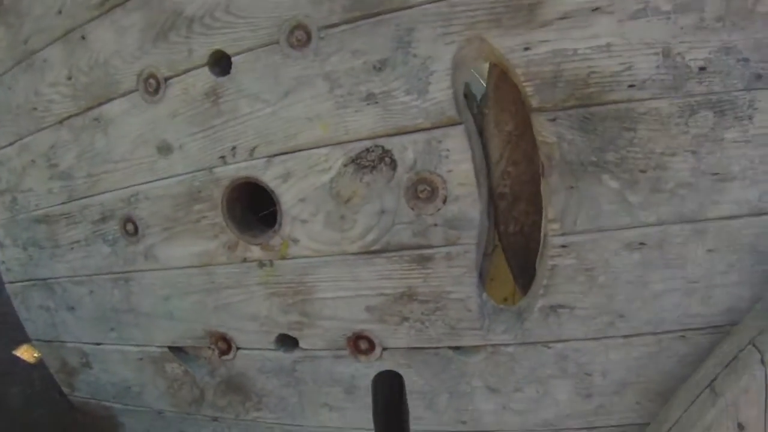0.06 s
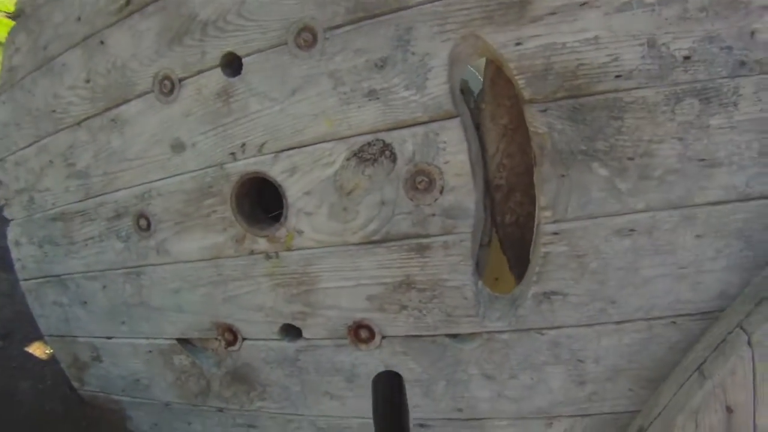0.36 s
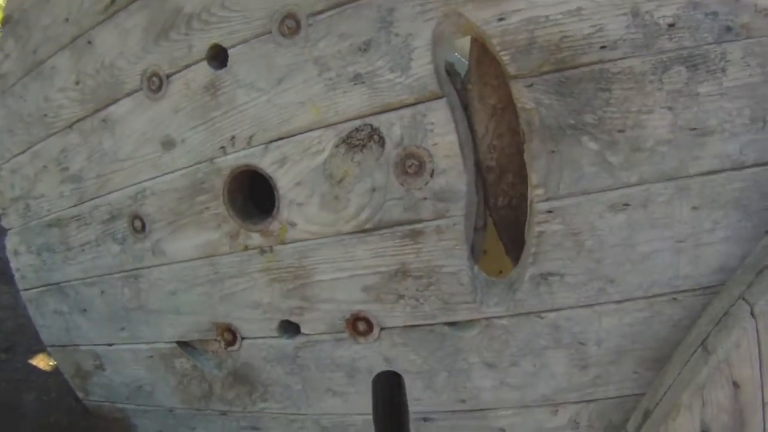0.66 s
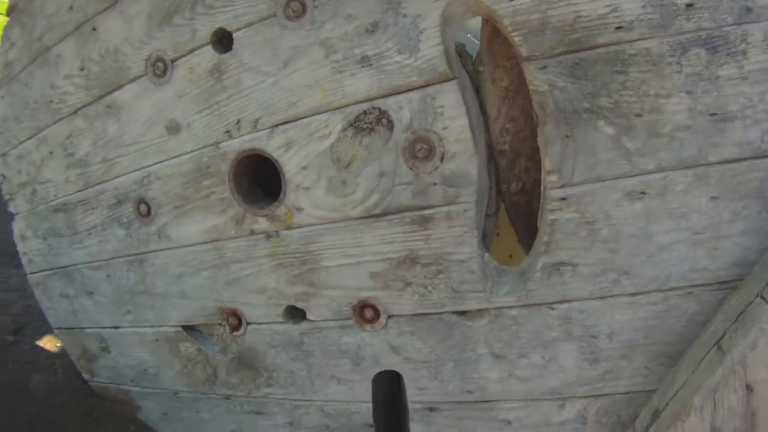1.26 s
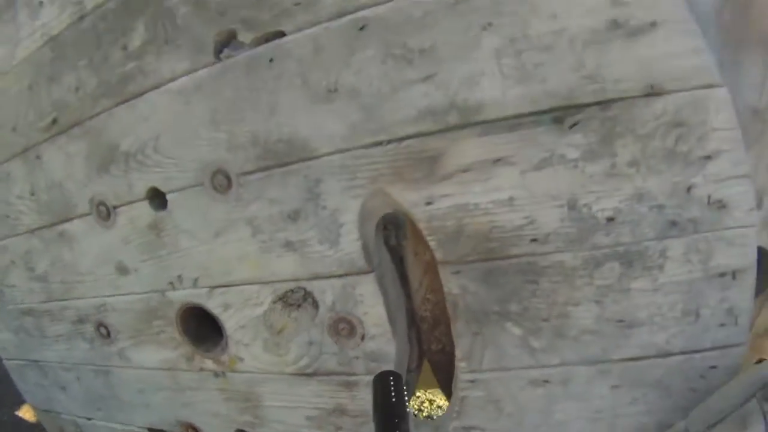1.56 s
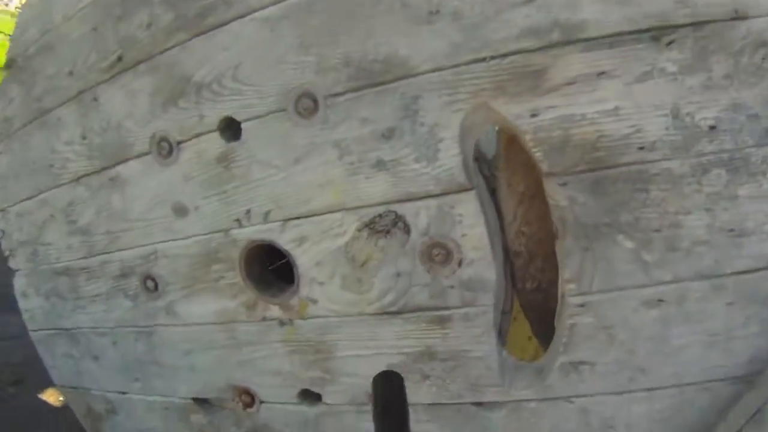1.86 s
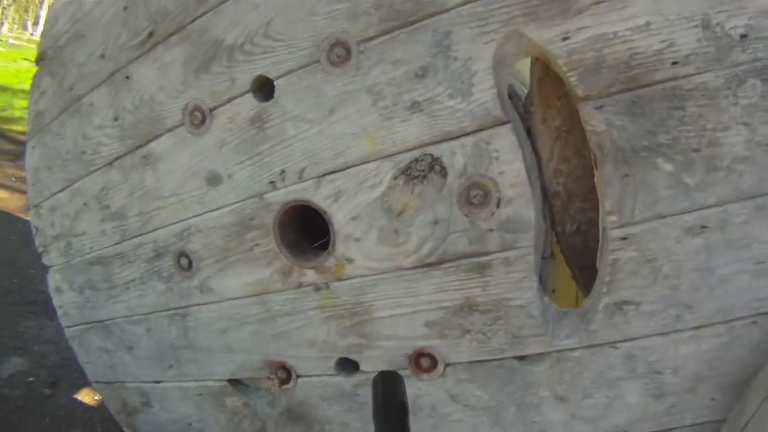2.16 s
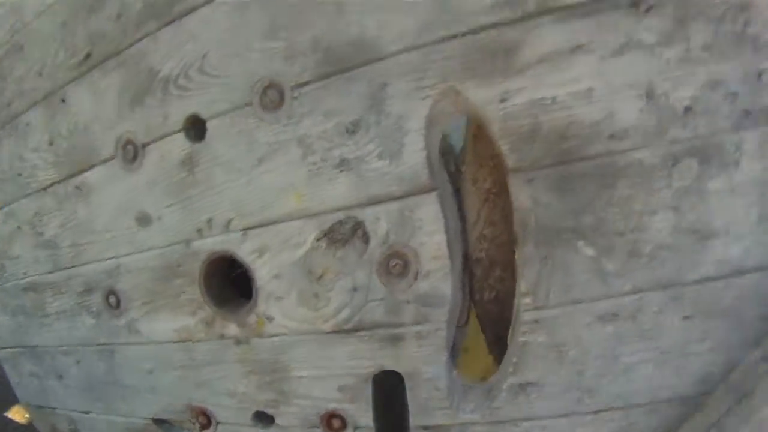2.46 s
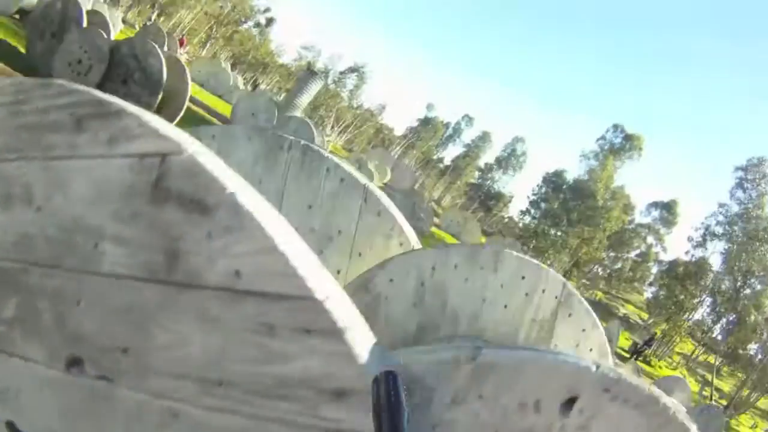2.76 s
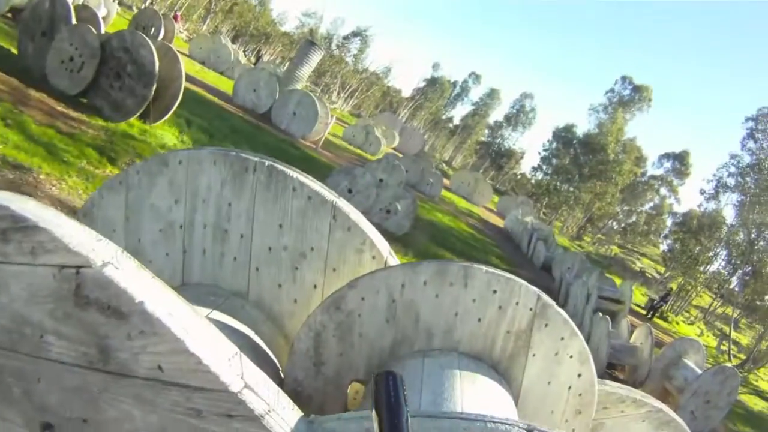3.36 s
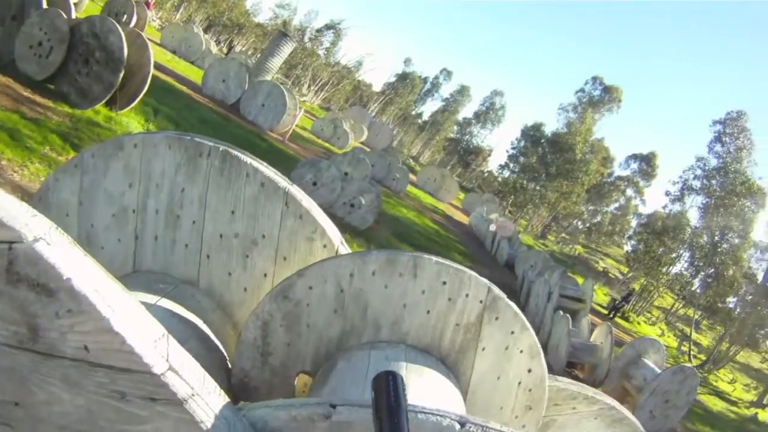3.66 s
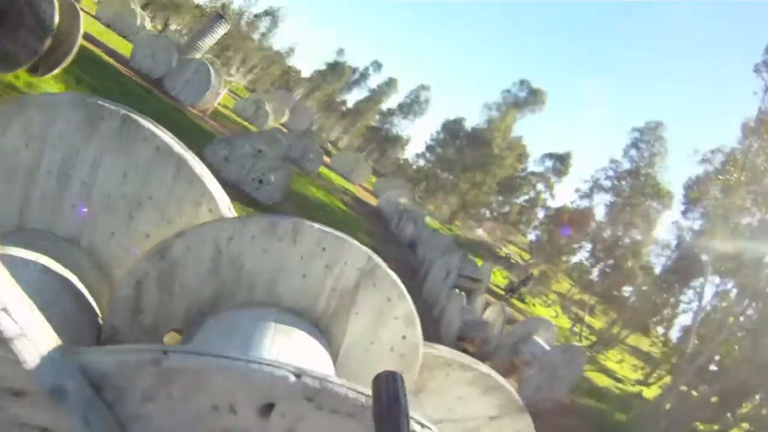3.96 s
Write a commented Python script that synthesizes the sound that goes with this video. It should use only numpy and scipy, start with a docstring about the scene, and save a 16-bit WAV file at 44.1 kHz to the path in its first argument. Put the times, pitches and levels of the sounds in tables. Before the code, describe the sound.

A paintball hopper rattles lightly up close at the start, with low handling rumble. Distant paint hits crack around 0.5 and 1.1 seconds, echoing over an open field. The hopper churns and knocks loudly from 1.4 to 2.3 seconds, with soft thumps, and again from 2.8. Three quick, hollow marker shots pop between 3.2 and 3.4 seconds. The rattle then eases, and a faint tone rings from 3.6.

```python
"""A paintball hopper churns and knocks in bursts, heard close up by one microphone in a plastic camera case.
The case rides on the player's gear behind a wooden cable spool: the balls ring it, movement thumps it.
Late on, the marker fires three shots at close range, each followed by its bolt.
Further off, other players' paint cracks on the spools and echoes over the open field.
A faint tone rings at the end."""
import sys
import numpy as np
from scipy import signal
from scipy.fft import rfft, irfft, next_fast_len
from scipy.io import wavfile
from scipy.ndimage import uniform_filter1d, minimum_filter1d, map_coordinates

SR = 44100
rng = np.random.default_rng(int(sys.argv[2]) if len(sys.argv) > 2 else 0)


def unload_audio(sound):
    """Save the sound as a 16-bit wav file, at the path given as the first command line argument."""
    columns = np.transpose(np.atleast_2d(sound))
    # keep every value between -1 and 1, then stretch to whole-number steps
    steps = np.round(np.clip(columns, -1, 1) * 32767)
    wavfile.write(sys.argv[1], SR, steps.astype(np.int16))


N = 176400

# hush of the open field: f/Hz, level/dB
HUSH_SPECTRUM = [(20, -2.5), (80, -4.5), (180, -28), (260, -31.5), (400, -30.5), (800, -32.5), (1100, -34),
                 (2300, -33.5), (4000, -37.5), (6000, -43)]
# handling rumble on the case: t/s, level/dB
RUMBLE_LEVELS = [(0.0, -33.5), (0.34, -25), (0.63, -58.5), (0.69, -35.5), (1.04, -63.5), (1.06, -51.5),
                 (1.25, -63), (1.51, -23), (1.56, -50), (1.6, -32), (1.67, -17.5), (1.73, -37),
                 (1.79, -26.5), (1.96, -32.5), (2.13, -23), (2.17, -52), (2.23, -34), (2.42, -45.5),
                 (2.54, -24), (2.6, -43.5), (2.79, -46), (2.87, -20), (3.29, -30), (3.34, -38), (3.4, -36),
                 (3.46, -39), (3.62, -30), (3.65, -36), (3.74, -23.5), (3.77, -42.5), (3.85, -23),
                 (3.89, -54), (4.0, -27.5)]
# colour of that rumble: f/Hz, level/dB
RUMBLE_SPECTRUM = [(25, -23), (58, -9.5), (90, 0.5), (130, -7.5), (190, -25), (240, -13), (400, -33),
                   (1500, -64.5)]
# slow sway of the camera: t/s, level/dB
SWAY_LEVELS = [(0.0, -56), (0.13, -27.5), (0.21, -44), (1.18, -51.5), (1.7, -32.5), (1.97, -44),
               (2.02, -38), (2.47, -57), (2.52, -32.5), (2.82, -31), (2.88, -19.5), (2.94, -38),
               (3.26, -35), (4.0, -45)]
# colour of that sway: f/Hz, level/dB
SWAY_SPECTRUM = [(12, -15), (26, -21.5), (37, 4), (55, -15.5), (90, -26.5), (400, -76.5)]
# soft bumps on the case: t/s, peak/dB, f/Hz, rise/s
CASE_BUMPS = [(1.487, -19.5, 81.6, 0.009), (1.667, -11.5, 112.6, 0.0052), (2.527, -14.5, 78.3, 0.011),
              (2.864, -13.5, 37.3, 0.0076), (3.001, -16.5, 108, 0.011), (3.809, -23, 83, 0.015),
              (3.84, -27, 87.3, 0.0095)]
# paint bursting on nearby spools: t/s, relative level/dB, echo offset/dB
PAINT_CRACKS = [(0.422, -32.5, -35), (0.435, -27.5, -9.5), (0.446, -31.5, -27), (0.457, -34.5, -11),
                (0.496, -38.5, -17), (0.5715, -30, -21), (1.064, -21, -1.5), (1.381, -36, -41),
                (1.583, -37.5, -27), (3.928, -41.5, -0.5)]
# resonances in airborne sound at the microphone: f/Hz, width/Hz, level/dB
AIR_PEAKS = [(1085, 120, -7.5), (1476, 120, -4.5), (2250, 480, -0.5), (2720, 450, -7), (3780, 220, -1.5),
             (5140, 600, -20.5)]
# airborne sound between those resonances: f/Hz, level/dB
AIR_FLOOR = [(60, -14.5), (300, -13), (700, -21), (2500, -14), (4600, -14.5), (6000, -16)]
# resonances of the plastic case: f/Hz, width/Hz, level/dB
CASE_PEAKS = [(953, 326, -8.5), (1108, 170, 2.26), (1461, 330, 0), (1820, 1200, -14), (2203, 400, -5.5),
              (2770, 150, -19), (3070, 190, -32.5), (3840, 430, -28), (5030, 310, -38)]
# what the case passes between its resonances: f/Hz, level/dB
CASE_FLOOR = [(40, -32.5), (250, -17.5), (500, -24), (750, -17.5), (1300, -23), (2400, -43), (3300, -29),
              (4500, -42), (6000, -50)]
# shots of the marker: t/s, pop/dB, jolt of the case/dB, rise of the jolt/s
MARKER_SHOTS = [(3.1756, 1, 3.5, 0.00055), (3.2559, -4.5, -13.5, 0.00046), (3.3825, -0.5, -14, 0.0012)]
# colour of the marker's pop: f/Hz, level/dB
POP_SPECTRUM = [(40, -17), (120, -8.5), (220, -13), (360, -7.5), (520, -13), (780, 0), (1100, -3),
                (1400, -21.5), (2200, -12), (3200, -32.5), (6000, -58)]
# how hard the balls churn in the hopper: t/s, level/dB
CHURN_LEVELS = [(0, -34.5), (.12, -42), (.2, -36), (.36, -35.5), (.41, -52.5), (.55, -62), (.7, -55.5),
                (.85, -71), (1.36, -64), (1.42, -48.5), (1.47, -23.5), (1.55, -63), (1.64, -20),
                (1.83, -20.5), (2.12, -27), (2.19, -26), (2.23, -53.5), (2.4, -66), (2.79, -65.5),
                (2.85, -24), (2.88, -16), (3.0, -16.5), (3.16, -18.5), (3.21, -27), (3.44, -29), (3.5, -27),
                (3.58, -29), (3.71, -36.5), (3.76, -54), (3.91, -60), (4, -29)]
# hard knocks of the hopper, levels relative: t/s, low ring/dB, high ring/dB, rise/s
HOPPER_KNOCKS = [(.0069, -31, -35, 0.00093), (0.0249, -36, -35.5, 0.00075), (0.047, -39, -37.5, .0024),
                 (0.0717, -37.5, -45, 0.0019), (0.0883, -31.5, -34, .0013), (.1226, -36.5, -39, .0006),
                 (0.1539, -30.5, -33.5, 0.00034), (0.1674, -24.5, -21, 0.00037),
                 (0.1753, -23.5, -23, 0.00088), (0.1839, -29.5, -29, 0.0013), (.1903, -27.5, -34, 0.0018),
                 (.216, -27, -39, 0.002), (0.2292, -21.5, -25.5, 0.0018), (.2595, -19.5, -15.5, .0013),
                 (.2866, -32, -40, 0.00061), (0.317, -26, -29.5, 0.0015), (0.3272, -33, -29, 0.00085),
                 (0.341, -25.5, -31.5, 0.0015), (.359, -24.5, -25.5, 0.0026), (0.434, -30, -33, 0.005),
                 (0.45, -33, -35, 0.0041), (0.465, -32.5, -35.5, .002), (0.493, -37, -39, 0.004),
                 (0.6797, -42.5, -49.5, 0.0014), (.703, -56, -54, 0.0014), (0.792, -57, -66, 0.0011),
                 (1.3851, -35, -29.5, 0.0022), (1.4322, -25, -26.5, 0.0026), (1.462, -30.5, -40, 0.0017),
                 (1.4835, -31, -33.5, 0.001), (1.515, -37, -44, 0.0027), (1.563, -45, -45.5, 0.001),
                 (1.599, -32, -43, 0.0016), (1.627, -20.5, -20, .0012), (1.6614, -10.5, -5, .0014),
                 (1.6929, -13, -20, 0.0011), (1.716, -34, -29, 0.0016), (1.734, -36, -33, 0.0023),
                 (1.7562, -16, -13.5, 0.0011), (1.7609, -19, -24, 0.0014), (1.7826, -23, -19.5, 0.0016),
                 (1.812, -18.5, -24, 0.001), (1.821, -17, -12.5, 0.0031), (1.8545, -24, -15.5, 0.0028),
                 (1.8685, -13.5, -11.5, .0014), (1.886, -22, -22, 0.0017), (1.9116, -29, -23, 0.0014),
                 (1.937, -18.5, -15.5, 0.0022), (1.9633, -22, -27.5, 0.00087),
                 (1.9791, -22.5, -27, 0.00079), (1.993, -28.5, -27, 0.0015), (2.0113, -15.5, -20, .0019),
                 (2.026, -19.5, -31, 0.0015), (2.039, -17.5, -15.5, .0018), (2.0571, -22, -28, 0.0016),
                 (2.0729, -19.5, -16.5, 0.0029), (2.0921, -21, -18, 0.0016), (2.1029, -18.5, -18.5, .0024),
                 (2.1163, -10, -17.5, 0.00097), (2.125, -21.5, -29, 0.0015), (2.143, -15.5, -27.5, 0.0016),
                 (2.1683, -22.5, -32, 0.0026), (2.187, -28.5, -28.5, 0.0016), (2.199, -29.5, -34, 0.0009),
                 (2.2373, -18, -21.5, 0.00092), (2.2442, -19, -23, 0.0012), (2.2714, -29.5, -37, 0.001),
                 (2.285, -34.5, -41.5, 0.0026), (2.318, -42, -55, 0.0018), (2.362, -43.5, -45, 0.00076),
                 (2.456, -61, -66.5, .0012), (2.4772, -24.5, -29, .0016), (2.5044, -37, -40.5, 0.0019),
                 (2.5225, -31, -32.5, 0.0022), (2.544, -46, -45, 0.0026), (2.6166, -29.5, -33, 0.0013),
                 (2.628, -45, -48, 0.0011), (2.782, -52, -60, 0.0014), (2.8114, -28.5, -37, 0.0021),
                 (2.839, -23.5, -31.5, 0.00072), (2.8609, -17.5, -18.5, 0.0014),
                 (2.8857, -10.5, -11.5, 0.00095), (2.9284, -13.5, -15, .0026), (2.9429, -15.5, -18, .0019),
                 (2.956, -19, -16.5, 0.0012), (2.971, -23, -15, 0.0029), (2.9856, -14, -14.5, 0.0032),
                 (3.004, -16, -15.5, .0017), (3.018, -38, -23.5, 0.0016), (3.0375, -22, -20.5, 0.0012),
                 (3.0483, -33, -17.5, 0.0011), (3.0667, -18, -15.5, 0.0019), (3.0931, -29, -17.5, .0014),
                 (3.1021, -28, -14.5, 0.0022), (3.146, -17.5, -12.5, .0024), (3.1631, -14, -19.5, 0.0014),
                 (3.3494, -27.5, -29, 0.0056), (3.5617, -31, -24.5, 0.0024), (3.608, -36, -41, 0.0011),
                 (3.622, -23, -34, .0014), (3.6304, -28, -54, 0.0022), (3.7001, -26, -42, 0.0015),
                 (3.8035, -30, -29.5, 0.0011), (3.8345, -22.5, -29.5, 0.0013), (3.855, -44, -51.5, 0.001),
                 (3.9685, -32.5, -50, 0.0015)]


def amp(db):
    """Decibels to gain."""
    return 10 ** (np.asarray(db) / 20)


def unit(x):
    """x at rms 1."""
    return x / np.sqrt(np.mean(x ** 2) + 1e-20)


def burst(x):
    """x with the energy of 10 ms at rms 1."""
    return x / np.sqrt(np.sum(x ** 2) / (SR * .01) + 1e-20)


def curve(rows):
    """One value per sample from rows of t/s, value."""
    return np.interp(np.arange(N) / SR, *np.transpose(rows))


def wobble(per_s):
    """A smooth random curve with per_s knots a second."""
    knots = rng.standard_normal(int(N * per_s / SR) + 4)
    return map_coordinates(knots, [np.arange(N) * per_s / SR])


def colour(floor, peaks=(), size=8192):
    """Causal impulse response of a broad spectrum with steep resonances on top."""
    hz = np.fft.rfftfreq(size, 1 / SR)
    floor_hz, floor_db = np.transpose(floor)
    power = amp(np.interp(np.log(hz + 1), np.log(floor_hz), floor_db)) ** 2
    for centre, width, db in peaks:
        power += (amp(db) / (1 + (2 * (hz - centre) / width) ** 2) ** 1.25) ** 2
    cepstrum = irfft(np.log(power) / 2)
    cepstrum[1:size // 2] *= 2  # fold to minimum phase
    cepstrum[size // 2 + 1:] = 0
    return irfft(np.exp(rfft(cepstrum)))[:size // 2]


def through(x, response):
    """x convolved with a response, at its own length."""
    return signal.fftconvolve(x, response)[:len(x)]


def noise(response, size=N):
    """Noise coloured by a response, at rms 1."""
    return unit(through(rng.standard_normal(size), response))


def below(x, hz):
    """x cut steeply above hz."""
    size = next_fast_len(N + SR // 2)
    spectrum = rfft(x, size) / (1 + (np.fft.rfftfreq(size, 1 / SR) / hz) ** 120)
    return irfft(spectrum, size)[..., :N]


def add(out, s, x):
    """Mix x into out from time s."""
    i = max(0, round(s * SR))
    out[i:i + len(x)] += x[:max(0, len(out) - i)]


def contact(rise_s, size=4096):
    """The force of one rough contact: noise that swells and dies within milliseconds."""
    age = np.arange(size) / SR / rise_s
    return age ** 2 * np.exp(-age) * rng.standard_normal(size)


def strike(rise_s, response):
    """One rough contact heard through a response."""
    return burst(through(contact(rise_s), response))


def case_rings(split_hz=1290):
    """The response of the case around the microphone, parted into a low and a high ring."""
    case = colour(CASE_FLOOR, CASE_PEAKS)
    filters = [signal.butter(6, split_hz, kind, fs=SR, output="sos") for kind in ("low", "high")]
    return [signal.sosfilt(sos, case) for sos in filters]


def field_hush(db=-51.5):
    """The open field lies behind everything as a low, even hush."""
    return amp(db) * noise(colour(HUSH_SPECTRUM))


def faint_tone(hz=735, db=-44.5, start_s=3.62, rise_s=.089, fade_db_per_s=23):
    """A faint pure tone comes in late and slowly fades."""
    t = np.maximum(np.arange(N) / SR - start_s, 0)
    envelope = np.minimum(t / rise_s, 1) * amp(db - fade_db_per_s * t)
    return envelope * np.sin(2 * np.pi * hz * t)


def paint_hits(rise_s=.0017, slap_s=.021, slap_loss_db=4.5, field_rise_s=.017, field_t60_s=.68):
    """Away from the microphone paint cracks, slaps between the spools and dies away over the field."""
    crack_db, slap_db, field_db, opening_db = 2.5, -1.5, -7, -46
    out, air = np.zeros(N), colour(AIR_FLOOR, AIR_PEAKS)
    t = np.arange(SR // 2) / SR
    decay = amp(-60 * t / field_t60_s)
    for s, db, echo_db in PAINT_CRACKS:
        add(out, s, amp(db + crack_db) * strike(rise_s, air))
        for bounce in range(4):
            slap = amp(db + echo_db + slap_db - bounce * slap_loss_db) * strike(2 * rise_s, air)
            add(out, s + (bounce + 1) * slap_s, slap)
        tail = rng.standard_normal(len(t)) * decay * (1 - np.exp(-t / field_rise_s))
        add(out, s, amp(db + echo_db + field_db) * burst(through(tail, air)))
    add(out, 0, amp(opening_db) * decay * noise(air, len(t)))  # an earlier hit's echo, still dying
    return out


def handling(rumble_trim_db=-1):
    """Right at the microphone, the player's movement rumbles, sways and softly bumps the case."""
    out = amp(curve(RUMBLE_LEVELS) + rumble_trim_db) * noise(colour(RUMBLE_SPECTRUM))
    out += amp(curve(SWAY_LEVELS)) * noise(colour(SWAY_SPECTRUM))
    t = np.arange(SR // 5) / SR
    for s, db, hz, rise_s in CASE_BUMPS:
        envelope = amp(db) * t / rise_s * np.exp(1 - t / rise_s)
        add(out, s, envelope * np.sin(2 * np.pi * hz * t))
    return out


def marker(bolt_delay_s=.0185, bolt_pop_db=-12.5, bolt_jolt_db=-23.5, bolt_rise_s=.0015):
    """At close range a hollow pop jolts the case; the bolt returns with a weaker one."""
    out, case = np.zeros(N), colour(CASE_FLOOR, CASE_PEAKS)
    pop = burst(colour(POP_SPECTRUM))
    for s, db, jolt_db, rise_s in MARKER_SHOTS:
        shot = amp(db) * pop + amp(jolt_db) * strike(rise_s, case)
        bolt = amp(db + bolt_pop_db) * pop + amp(bolt_jolt_db) * strike(bolt_rise_s, case)
        add(out, s, shot)
        add(out, s + bolt_delay_s, bolt)
    return out


def hopper_churn(contacts_per_s=2200, spread_db=4, ring_db=(0, -1.5), shift_db=2):
    """Close up, a surging stream of small ball contacts rings the case; each ring's share keeps shifting."""
    hits = rng.random(N) < contacts_per_s / SR
    force = hits * np.sign(rng.standard_normal(N))
    force *= amp(spread_db * np.clip(rng.standard_normal(N), -2, 2))
    flutter_db = 2.5 * np.tanh(wobble(per_s=200))
    surge_db = np.tanh(wobble(per_s=45))
    force *= amp(flutter_db + surge_db)
    rattle = np.zeros(N)
    for db, ring in zip(ring_db, case_rings()):
        share = amp(shift_db * wobble(per_s=110))
        rattle += amp(db) * unit(through(force * share, ring))
    return amp(curve(CHURN_LEVELS)) * rattle


def hopper_knocks(trim_db=2.5, detune=.032):
    """Each hard knock drives the case's two rings in its own proportion, at a slightly different pitch."""
    out, rings = np.zeros(N), case_rings()
    samples = np.arange(len(rings[0]))
    for s, *ring_db, rise_s in HOPPER_KNOCKS:
        force = contact(rise_s)
        pitch = 1 + detune * np.clip(rng.standard_normal(), -2, 2)
        for db, ring in zip(ring_db, rings):
            detuned = np.interp(pitch * samples, samples, ring)
            add(out, s, amp(db + trim_db) * burst(through(force, detuned)))
    return out


def scene():
    """Everything reaches one microphone inside the case, the same on both channels."""
    hopper = hopper_churn() + hopper_knocks()
    mono = hopper + marker() + paint_hits() + handling() + field_hush() + faint_tone()
    return np.array([mono, mono])


def record(dry):
    """The camera limits, clips and holds each slow sample, mirroring the sound into a gritty treble."""
    hold_hz, top_hz = 12000, 15500
    limit, limit_range_db, limit_s, ceiling = .9, 5, .002, .92
    sound = below(dry, .48 * hold_hz)
    window = round(limit_s * SR)
    needed_gain = np.clip(limit / (np.abs(sound) + 1e-9), amp(-limit_range_db), 1)
    limited = sound * uniform_filter1d(minimum_filter1d(needed_gain, window), window)
    slow = signal.resample_poly(limited, hold_hz, SR, axis=1, window=("kaiser", 2))
    clipped = np.clip(slow, -ceiling, ceiling)
    held = signal.resample_poly(np.repeat(clipped, 4, axis=1), SR, 4 * hold_hz, axis=1)
    return below(held, top_hz)


dry = scene()
out = record(dry)
unload_audio(out)
```